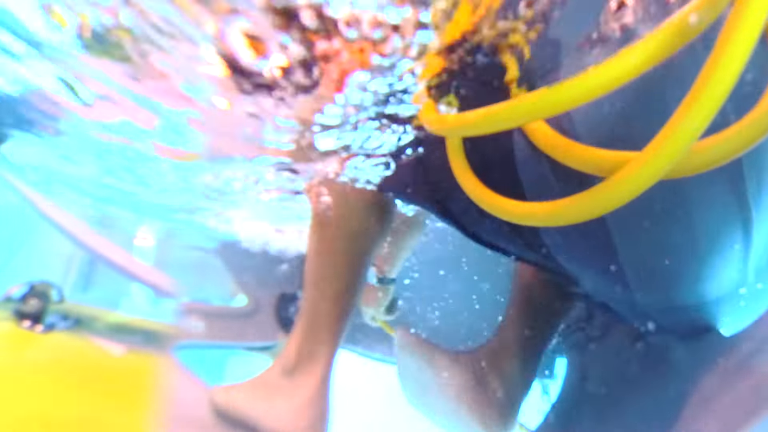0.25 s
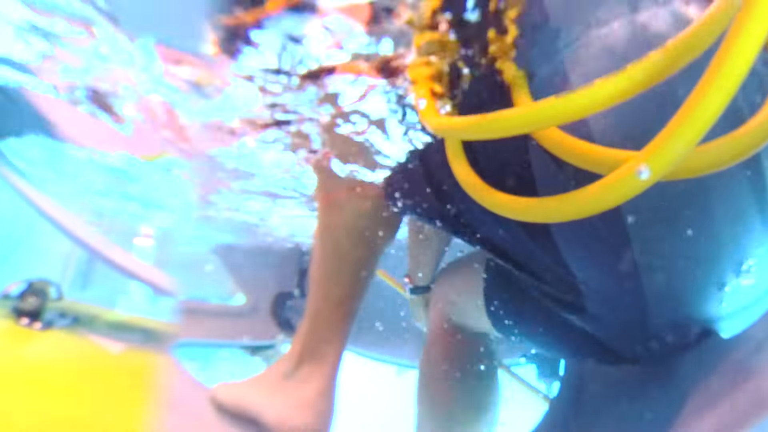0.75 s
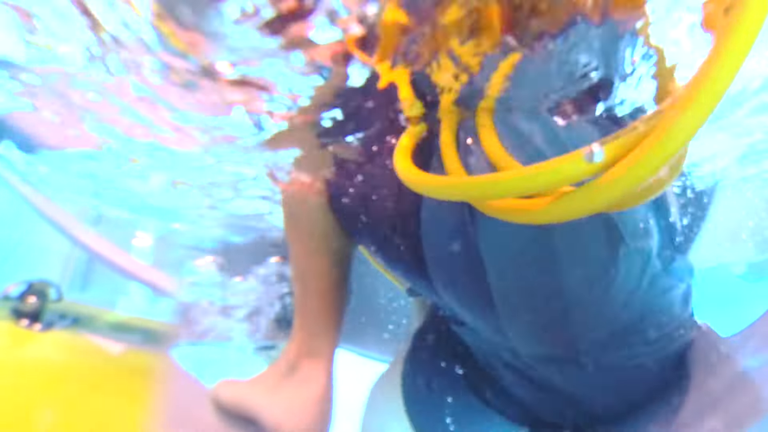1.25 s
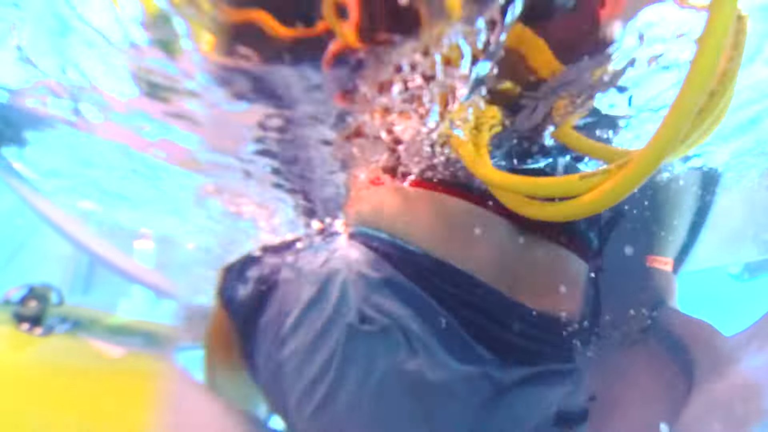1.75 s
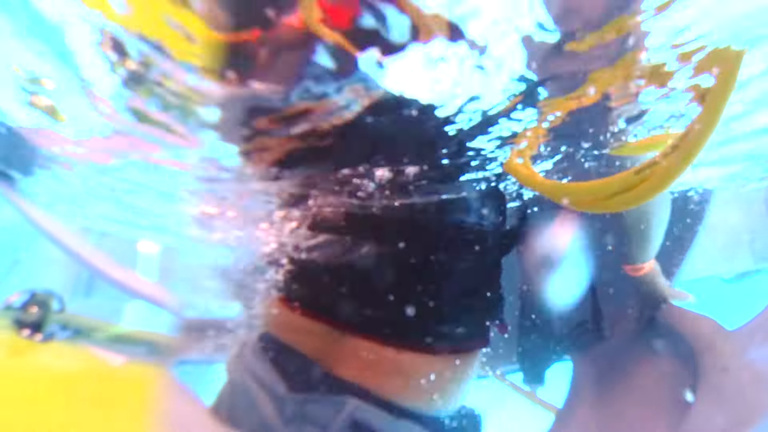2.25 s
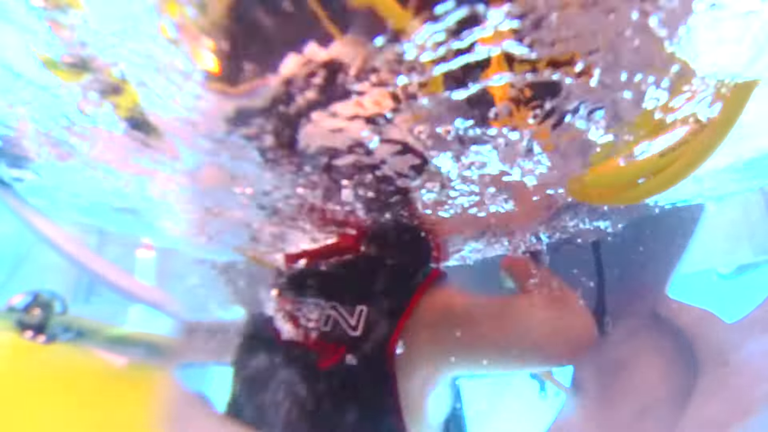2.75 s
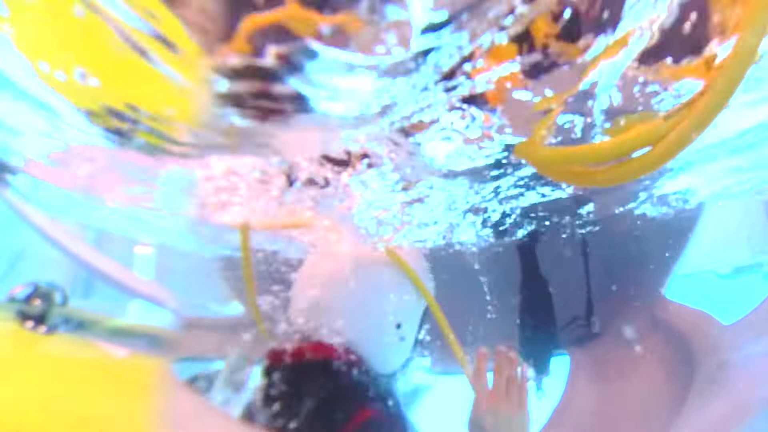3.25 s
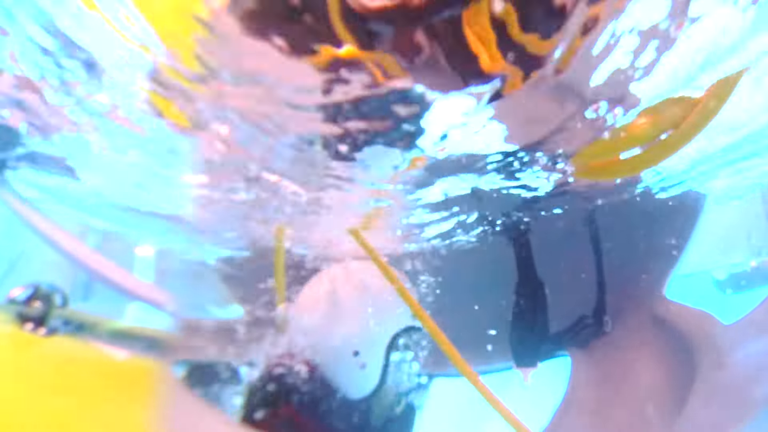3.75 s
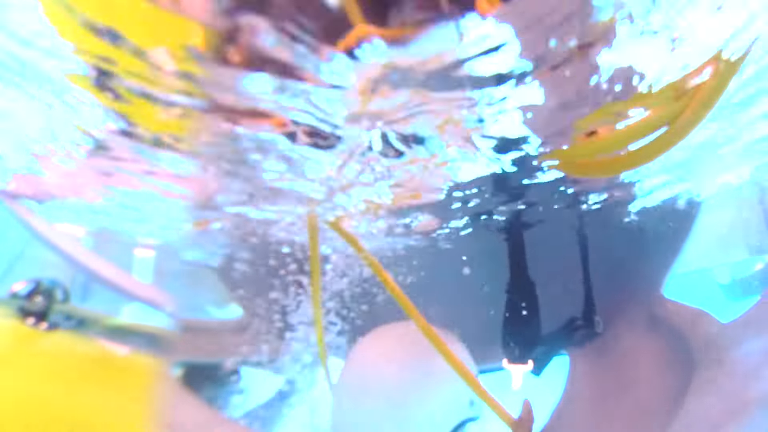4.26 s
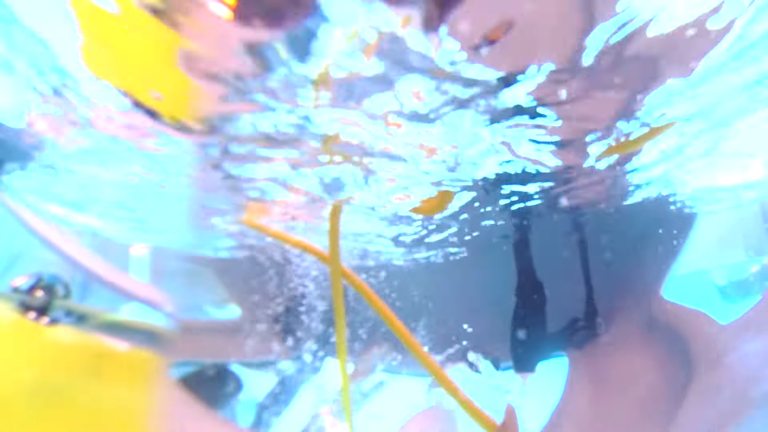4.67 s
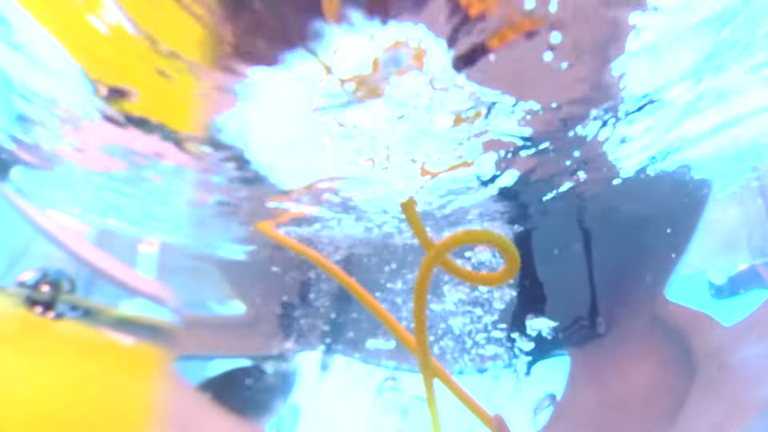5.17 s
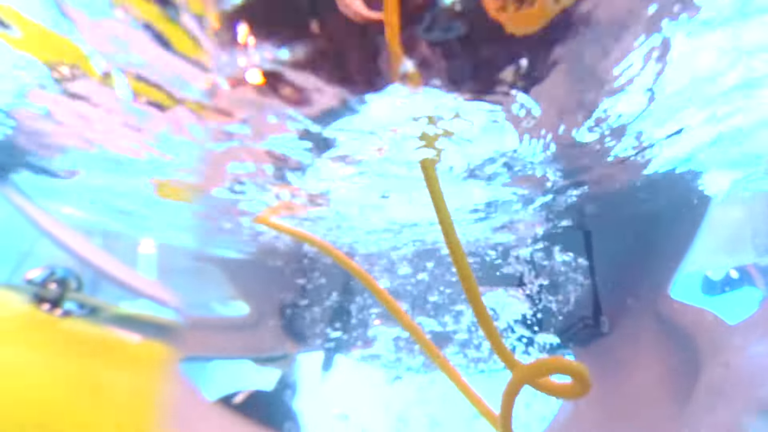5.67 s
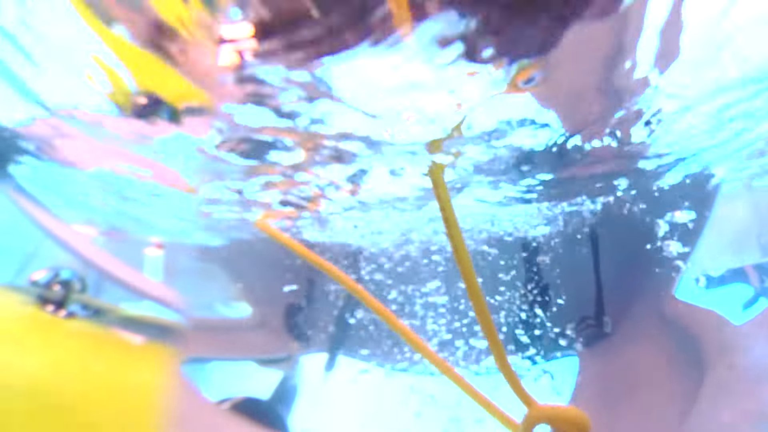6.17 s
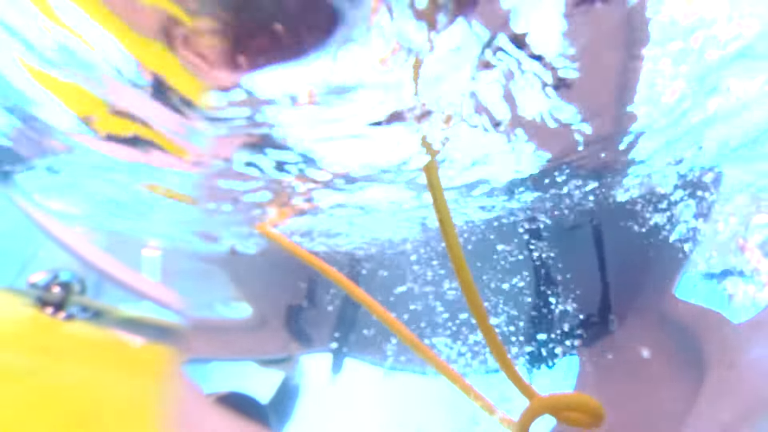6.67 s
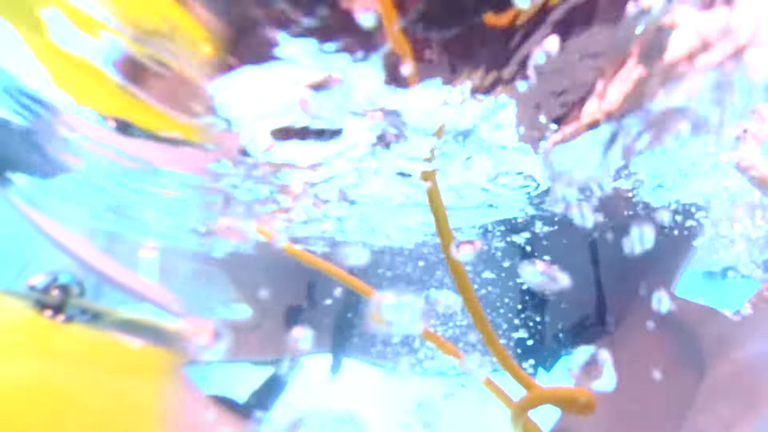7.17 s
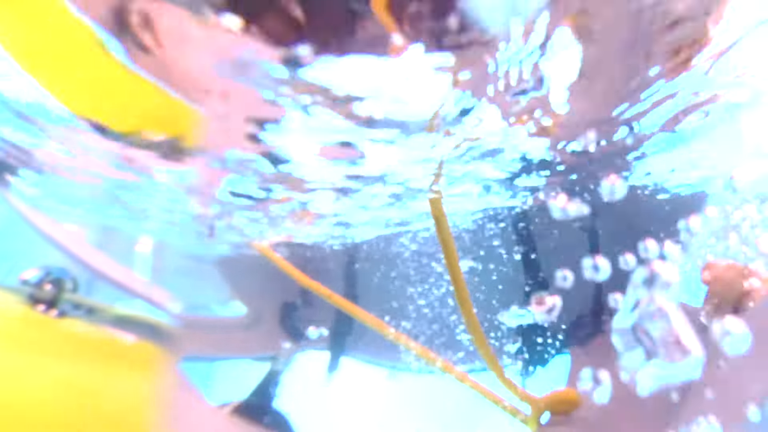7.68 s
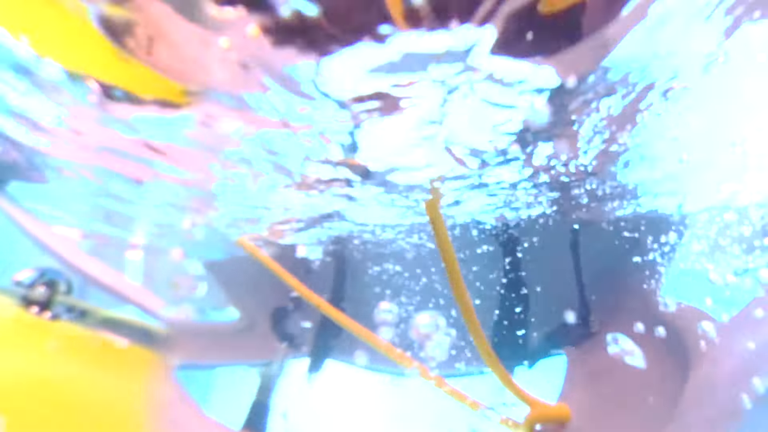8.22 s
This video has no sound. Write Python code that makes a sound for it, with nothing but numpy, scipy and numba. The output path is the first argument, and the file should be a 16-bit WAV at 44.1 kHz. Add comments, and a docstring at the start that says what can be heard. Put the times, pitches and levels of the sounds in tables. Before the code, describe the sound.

A camera sealed in a housing under water hears a helmet diver step down into a pool. From the start, muffled bubbles boom, gurgle and splash over low rumbling water pressure, with a brief surge and watery slaps around 0.25-0.5 s, then a thinner moment. The churn refills by 0.8 s; a heavy knock lands at 1.6 s. Foamy fizz thickens near 2.2 s. More knocks fall at 3.0, 3.7 and 3.9 s, with a bright splashy burst around 3.5 s and another surge near 4.6 s. Dense popping continues to 6.5 s, flecked with faint dry ticks. A dull knock at 6.9 s precedes thinning foam; from 7.1 s rounded blups glide past closely. Two sharp clicks at 7.75 s end the rush in a hush with faint sputtering hiss. A hollow knock at 7.9 s brings a few blups, near quiet at 8.1 s, then a warbling stream of similar bubbles until the end.

```python
"""Splashing, fizzing and booming bubbles, as a helmet diver climbs down into a pool.
They are heard by a camera under water in its sealed housing, which muffles them.
Most bubbles are fading sines that rise slightly in pitch; rounded blups swell, fade and glide up or down.
Filtered noise makes the rumble and hiss, short impulses tick, and damped sines knock.
Near the end a burst of air gurgles past the housing, clicks on it, hushes and knocks."""
import sys
import numpy as np
from scipy import signal
from scipy.io import wavfile
from scipy.ndimage import uniform_filter1d
from numba import njit

SR = 44100
rng = np.random.default_rng(int(sys.argv[2]) if len(sys.argv) > 2 else 0)


def store_wav(level_fs):
    """Save 16-bit WAV to argv[1]."""
    pcm = np.round(np.clip(np.atleast_2d(level_fs), -1, 1) * 32767)
    wavfile.write(sys.argv[1], SR, pcm.T.astype(np.int16))


N = 372643
TIME = np.arange(N) / SR  # seconds

# Levels in the tables are relative: later gains and filters shift them.
# water pushing on the housing, shape of its spectrum: f/Hz, level/dB per Hz
RUMBLE_SPECTRUM = [(10, -30), (18, -25.5), (28, -5), (50, -0.5), (90, -1.5), (140, -3.5), (300, -16.5),
                   (1000, -55.5), (3000, -92)]
# how hard the moving water leans on the housing: t/s, level/dB
PUSH_LEVEL = [(0, -30.5), (.25, -46), (.65, -33.5), (1.2, -40), (1.9, -31), (3.0, -34), (3.25, -39),
              (3.75, -46), (4.05, -31.5), (4.45, -35.5), (4.8, -44), (5.35, -38), (5.7, -48), (6.45, -53.5),
              (7.1, -31), (7.6, -53), (7.76, -34), (8.05, -56), (8.45, -35.5)]
# what the housing lets through: f/Hz, level/dB
HOUSING_SPECTRUM = [(20, 0.5), (1500, -1), (2000, -5), (3000, -14), (3900, -21), (4600, -39.5),
                    (8000, -58.5), (16000, -72.5)]
# faint hiss in the hush and over the stream: t/s, level/dB
HISS_LEVEL = [(7.72, -100), (7.745, -66), (7.81, -70), (7.86, -64), (7.888, -64), (7.92, -100), (8.2, -95),
              (8.29, -80), (8.36, -95)]
# lower and upper part of that hiss: f/Hz, level/dB
LOW_HISS_SPECTRUM = [(200, -3), (2500, -2), (3500, -4.5), (4700, 1), (6500, -7), (12000, -27)]
HIGH_HISS_SPECTRUM = [(200, -21), (5000, -13.5), (7200, -3), (10500, -2), (12500, -11), (17000, -22)]
# faint, dry ticks: t/s, peak level/dB
TICK_EVENTS = [(.167, -50), (.1765, -41), (.2663, -48), (.7866, -41), (.794, -51), (.8295, -46),
               (.8365, -46), (1.2864, -49.5), (1.3664, -54), (1.4664, -56), (2.437, -50.5), (2.5297, -47),
               (3.1063, -45), (3.6062, -53), (5.0669, -49.5), (5.1761, -51), (5.2565, -46), (5.3462, -58),
               (5.466, -54), (6.0865, -51), (6.1664, -44), (6.4562, -49), (6.5171, -43), (6.8668, -51),
               (7.097, -56), (7.4365, -55), (7.5462, -54.5), (7.576, -50), (8.141, -56), (8.277, -60),
               (8.336, -60)]
# colour of the ticks and the faint spray: f/Hz, level/dB
TICK_SPECTRUM = [(300, -23.5), (2000, -11), (4000, 8), (6000, -3), (9000, -10), (14000, -33.5),
                 (20000, -60)]
# sharp clicks as the air reaches the housing: t/s, peak level/dB
CLICK_EVENTS = [(7.7375, -16.5), (7.7575, -16.5), (7.7625, -41), (7.7778, -44), (7.7838, -40)]
# colour of the clicks: f/Hz, level/dB
CLICK_SPECTRUM = [(200, 18), (3000, -4), (7500, -6), (11500, -3), (14000, -17), (17000, -22)]
# stream of nearly equal bubbles singing around one pitch: t/s, level/dB
STREAM_LEVEL = [(0, -120), (8.10, -120), (8.15, -34), (8.18, -24), (8.33, -30.5), (8.41, -30), (8.44, -49)]
# slaps and knocks of water: t/s, peak level/dB, f/Hz, level of the spray/dB
KNOCK_EVENTS = [(0.2637, -19, 1100, -28.5), (.366, -14.5, 794, -26.5), (.519, -16.5, 1080, -27.5),
                (1.545, -13, 1170, -28.5), (1.636, -6.5, 540, -27), (1.661, -22, 1500, -32),
                (3.012, -8.5, 990, -32.5), (3.139, -17, 1360, -25.5), (3.71, -8.5, 960, -23.5),
                (3.92, -4.5, 1460, -31), (4.192, -13, 1010, -37), (4.211, -11.5, 1100, -32.5),
                (6.939, -3, 442, -42.5), (7.757, -13, 304, -53.5), (7.881, -24.5, 593, -61),
                (7.9030, -2.5, 686, -56)]
# sprays of small bubbles as an air pocket shatters: t/s, length/s, middle f/Hz, loudest peak level/dB
SPRAY_EVENTS = [(.19, .035, 3000, -40), (0.363, .012, 1150, -25.5), (0.511, 0.013, 2670, -32.5),
                (0.544, 0.073, 950, -23), (.57, 0.026, 2930, -37), (0.736, 0.047, 3640, -26.5),
                (.79, .035, 3700, -37), (0.879, 0.014, 1800, -21.5), (0.932, .015, 2680, -32.5),
                (1.85, 0.095, 1800, -21), (2.898, 0.045, 2420, -36), (3.517, 0.047, 2700, -25),
                (3.517, 0.054, 1680, -16), (3.98, .025, 566, -21.5), (4.058, 0.026, 2500, -35.5),
                (4.1, 0.044, 2220, -40), (5.836, .045, 1860, -17.5), (5.897, .012, 2790, -26),
                (6.616, 0.056, 3040, -31), (7.14, .02, 2390, -42), (7.201, 0.017, 2160, -34),
                (7.926, .015, 3000, -52), (8.26, 0.093, 3220, -44), (8.357, 0.087, 3200, -46)]
# rounded blups of bubbles sliding past: t/s, f/Hz, peak level/dB, length/s, rise/octaves (below 0: fall)
BLUP_EVENTS = [(.052, 493, -9.5, 0.018, 0.17), (0.184, 400, -20, 0.026, .1), (1.26, 330, -18.5, .04, .1),
               (1.412, 1240, -11, 0.0056, .1), (1.659, 1424, -14, 0.028, .05),
               (2.1182, 1400, -11, 0.0076, 0), (4.331, 1390, -15, 0.049, .03),
               (5.722, 1630, -9, .017, 0.18), (5.743, 107.3, -19.5, 0.08, .1),
               (5.905, 1300, -12, 0.013, 0.091), (6.658, 532, -14.5, 0.034, 0.072),
               (6.767, 171, -17, 0.039, .1), (6.797, 392, -16, 0.026, -0.11),
               (6.804, 112, -18.5, 0.064, 0.29), (6.835, 190, -12, 0.035, 0.48),
               (6.868, 190, -13, 0.077, 0.04), (7.011, 206, -14, 0.032, 0.32),
               (7.167, 960, -29, .035, 0.13), (7.243, 666, -21.5, 0.072, -.04),
               (7.322, 655, -23.5, 0.076, -0.089), (7.505, 340, -18, 0.03, -0.046),
               (7.625, 866, -20, 0.026, -.1), (7.19, 278, -16.5, 0.035, -0.14),
               (7.195, 622, -16.5, 0.07, 0.042), (7.381, 802, -14.5, 0.053, -0.021),
               (7.384, 289, -14, 0.055, 0.15), (7.461, 252, -17, 0.026, 0.048),
               (7.462, 376, -16, 0.021, -0.24), (7.476, 482, -18, 0.037, 0.14),
               (7.512, 494, -15.5, 0.05, 0.22), (7.559, 863, -18, 0.03, 0.15),
               (7.574, 407, -12, 0.042, 0.28), (7.624, 444, -11, 0.045, -0.014),
               (7.627, 559, -14.5, 0.046, 0.014), (7.68, 580, -15.5, 0.045, 0.028),
               (7.696, 374, -10, 0.021, -0.15), (7.711, 293, -16, 0.027, 0.23),
               (7.723, 466, -9, 0.027, -0.19), (7.733, 141, -17, 0.018, -1.2), (7.745, 48, -21, 0.027, -.3),
               (7.943, 485, -20, 0.031, -0.18), (7.944, 694.5, -22, 0.08, -0.0078),
               (8.006, 1060, -23.5, 0.014, .15), (8.01, 522, -25, 0.032, 0.27),
               (8.175, 975, -13.5, 0.064, 0.091), (8.237, 1045, -19, 0.025, -0.0088),
               (8.262, 964, -17, 0.023, -0.11), (8.29, 1036, -17, 0.025, -0.17),
               (8.304, 965, -15, 0.018, 0.28), (8.321, 1010, -20, 0.022, 0.27),
               (8.348, 145, -20, 0.035, 0.2), (8.371, 1020, -12.5, 0.028, 0.41),
               (8.398, 1035, -14, 0.035, 0.19)]
# strength of a cloud's bubbles by pitch: f/Hz, level/dB
STRENGTH_BY_PITCH = [(85, -15.5), (120, -6), (160, 1.5), (195, 5), (250, -0.5), (300, -1.5), (450, -2.5),
                     (620, 3.5), (780, 0), (1050, 4), (1190, 2), (1380, 8.5), (1600, -5), (2000, -6)]
# as foam gives way to separate bubbles, they are fewer and ring longer: t/s, factor
SEPARATENESS = [(0, 1.7), (.7, 1.1), (2.2, .9), (3.3, 1.2), (4.6, 1.0), (6.4, 1.1), (7.1, 1.9), (7.7, 1.4),
                (8.0, 2.4), (8.45, 2.2)]
# swells and dips of the churn: t/s, length/s, change/dB, depth of the lull afterwards/dB (below 0: none)
SWELLS_AND_DIPS = [(0.057, 0.16, 3, 1), (0.252, 0.036, 11.5, 5), (0.694, 0.19, 2, 4.5),
                   (1.632, 0.05, 7.5, 4), (2.465, 0.13, 1, 3.5), (2.724, 0.11, 0, 1.5),
                   (3.132, 0.023, 8.5, 11.5), (3.679, 0.014, -11.5, 3.5), (3.917, 0.19, -2, 3),
                   (5.87, 0.031, -1, 2), (6.948, 0.12, -0.5, 2), (7.637, 0.12, 1, 19.5),
                   (7.928, 0.15, 6, -3.5)]
# big, booming air pockets: t/s, level/dB
BOOM_LEVEL = [(0, -39.5), (.12, -27), (.32, -29.5), (.52, -42.5), (.78, -26), (1.3, -24), (1.75, -27.5),
              (2.4, -24.5), (3.1, -26), (3.3, -28.5), (3.48, -26.5), (3.7, -37.5), (3.95, -25.5),
              (4.35, -42), (4.7, -24), (5.2, -26.5), (5.8, -25.5), (6.1, -27.5), (6.4, -32), (6.85, -26),
              (7.6, -30), (8.0, -26), (8.12, -40.5), (8.2, -33.5), (8.45, -26.5)]
# gurgling, middle-sized bubbles: t/s, level/dB
GURGLE_LEVEL = [(0, -26.5), (.5, -43), (.8, -27.5), (1.25, -28.5), (1.6, -32), (1.78, -34.5), (1.92, -28),
                (2.4, -33), (2.85, -26), (3.3, -34.5), (3.6, -30.5), (4.15, -35.5), (4.4, -33),
                (4.85, -27.5), (5.85, -26.5), (6.2, -30.5), (6.5, -24.5), (6.98, -24.5), (7.14, -22.5),
                (7.22, -23), (7.72, -22), (8.05, -31.5), (8.11, -38), (8.18, -31.5), (8.33, -26.5),
                (8.45, -38)]
# small, splashing bubbles: t/s, level/dB
SPLASH_LEVEL = [(0, -22), (.35, -37.5), (.6, -26), (.9, -27), (1.22, -20.5), (1.75, -27.5), (1.95, -24),
                (2.12, -26), (2.35, -21.5), (2.85, -28), (3.1, -25), (3.27, -28), (3.4, -23.5),
                (3.57, -17.5), (4.05, -26.5), (4.25, -24.5), (4.65, -18.5), (5.05, -23), (5.35, -23),
                (5.7, -23), (6.1, -22), (6.5, -23), (6.9, -35), (7.42, -29), (7.75, -31.5), (8.11, -37),
                (8.2, -28.5), (8.3, -25), (8.45, -31)]
# foam, the fizz relative to the splash: t/s, level/dB
FOAM_LEVEL = [(0, -12), (.32, -17.5), (.62, -15), (.78, -10), (1.15, -16), (2.15, -5.5), (2.62, -14.5),
              (2.73, -8.5), (2.88, -15), (3.05, -8), (3.25, -13.5), (3.5, -12.5), (4.0, -17), (4.5, -13),
              (5.4, -15.5), (5.9, -12), (6.3, -14.5), (6.95, -11.5), (7.4, -28.5), (7.6, -32), (8.23, -34),
              (8.45, -28)]
# pitch of the smallest bubbles in the gurgle: t/s, f/Hz
SMALLEST_IN_GURGLE = [(6.48, 905), (6.62, 569), (7.05, 633), (7.2, 708), (7.45, 597), (7.7, 592),
                      (7.95, 740)]
# pitch of the smallest bubbles in the splash: t/s, f/Hz
SMALLEST_IN_SPLASH = [(0, 1387), (1.2, 1634), (7.0, 1670), (7.22, 887), (7.7, 896), (7.95, 1080),
                      (8.05, 1128), (8.2, 1052)]
# single loud bubbles close to the housing: t/s, f/Hz, peak level/dB, ring time/s
LOUD_BUBBLES = [(0.104, 456, -11, 0.0062), (.129, 835, -18, 0.0088), (.156, 1100, -9, 0.0088),
                (0.19, 202.4, -5.5, 0.013), (.262, 2060, -22, 0.003), (.267, 185.5, -8, 0.02),
                (.274, 333, -15.5, 0.0097), (.424, 3030, -33, 0.0033), (0.517, 3010, -34, 0.0046),
                (.676, 1366, -15.5, 0.0079), (0.729, 179, -8, 0.0073), (0.758, 1400, -11.5, 0.0043),
                (0.777, 1550, -15, 0.0018), (.802, 674, -11.5, 0.0088), (0.838, 2180, -20, .002),
                (0.851, 169.6, -7, 0.011), (.866, 3600, -22.5, 0.0034), (1.065, 1078, -16.5, 0.013),
                (1.155, 1360, -11, 0.0036), (1.179, 1410, -10.5, 0.02), (1.178, 1850, -10, 0.0052),
                (1.248, 1459, -11, 0.011), (1.265, 155, -11, 0.0091), (1.274, 269, -14, 0.0085),
                (1.305, 1050, -11, 0.0053), (1.319, 1340, -12.5, .008), (1.458, 2095, -13, 0.0049),
                (1.654, 284, -12, 0.018), (1.726, 1033, -13, 0.0098), (1.959, 211, -17, 0.014),
                (1.976, 930, -9, 0.0038), (2.073, 169.5, -12.5, 0.011), (2.135, 191.6, -10, 0.049),
                (2.251, 796, -17, 0.014), (2.373, 221, -12, 0.02), (2.538, 1078, -9.5, 0.0049),
                (2.555, 210.8, -11, 0.051), (2.678, 2860, -26, 0.0033), (2.721, 420, -12.5, 0.015),
                (2.74, 215, -16, 0.021), (2.752, 1290, -12, .0025), (2.771, 171, -11.5, 0.014),
                (2.803, 620, -15.5, 0.009), (2.837, 174, -12, 0.025), (2.887, 172, -15.5, .014),
                (2.966, 1010, -9, 0.0038), (3.12, 200, -7.5, 0.01), (3.132, 488, -18.5, 0.013),
                (3.154, 183, -9.5, 0.054), (3.297, 1317, -15.5, 0.0053), (3.305, 1920, -20.5, 0.0055),
                (3.405, 1120, -18, .006), (3.472, 1420, -9, 0.0022), (3.544, 1360, -11.5, .005),
                (3.558, 900, -16, 0.0059), (3.623, 1380, -6, 0.0023), (3.627, 775, -14.5, 0.0076),
                (3.642, 1320, -4, 0.0016), (3.645, 1100, -17.5, 0.0038), (3.84, 1421, -16, 0.0054),
                (3.85, 183.6, -9, 0.052), (3.952, 1720, -6.5, 0.0028), (3.984, 237, -9.5, 0.013),
                (4.013, 193, -6, 0.036), (4.194, 977, -9.5, 0.0063), (4.301, 1120, -15, .0035),
                (4.503, 876, -10, 0.012), (4.523, 1405, -5.5, 0.0045), (4.542, 985, -7, 0.0043),
                (4.56, 685, -14.5, 0.01), (4.563, 129, -16, 0.011), (4.595, 1310, -5, 0.0053),
                (4.608, 1464, -11, .005), (4.629, 1100, -13, 0.0041), (4.701, 1340, -8, 0.0077),
                (4.746, 377, -10, 0.0042), (4.782, 1340, -8, 0.0026), (4.912, 596, -13, 0.0075),
                (4.976, 273, -7.5, 0.0064), (4.989, 216.5, -11, 0.038), (5.075, 191, -11, 0.0053),
                (5.163, 1492, -10, 0.0062), (5.214, 911, -10.5, 0.015), (5.245, 1314, -6.5, 0.0038),
                (5.298, 210, -13.5, 0.012), (5.324, 132, -17, 0.014), (5.437, 1360, -9.5, 0.011),
                (5.444, 170.5, -16.5, .015), (5.474, 1342, -11, 0.0077), (5.477, 976, -9, 0.0015),
                (5.568, 215, -12.5, 0.024), (5.664, 1317, -10, 0.0058), (5.883, 457, -7.5, 0.0079),
                (5.908, 735, -9, 0.0076), (5.921, 191.6, -9, 0.052), (6.041, 1390, -6, 0.0022),
                (6.086, 797, -12, 0.0057), (6.087, 1450, -8.5, .005), (6.106, 966, -7, 0.0021),
                (6.117, 261, -16, 0.01), (6.215, 189.8, -13, 0.083), (6.301, 1240, -9, 0.0076),
                (6.324, 1007, -14, 0.016), (6.44, 728, -13.5, 0.015), (6.48, 675, -5.5, 0.0021),
                (6.557, 168, -8.5, 0.02), (6.628, 261.4, -13, 0.039), (6.655, 390, -9, 0.02),
                (6.666, 1370, -15.5, 0.0092), (6.726, 392, -6, 0.0065), (6.827, 2510, -24.5, 0.0032),
                (6.945, 600, -10, 0.0091), (6.993, 413, -6, 0.0045), (6.994, 1466, -17, 0.011),
                (6.999, 2730, -35, 0.0045), (7.079, 1583, -23.5, 0.0098), (7.096, 262, -8.5, 0.0046),
                (7.145, 2230, -39.5, 0.0048), (7.178, 1322, -25, 0.018), (7.198, 2250, -36, 0.0071),
                (7.421, 1456, -25, 0.011), (7.437, 2610, -40.5, 0.0038), (7.697, 1514, -38, 0.0023),
                (7.937, 3160, -36, .003), (8.139, 3730, -28, 0.0021), (8.158, 168, -8, 0.0049),
                (8.256, 716, -15, 0.0015), (8.257, 1550, -29.5, 0.0066), (8.286, 1790, -32.5, 0.0059),
                (8.286, 3140, -43, 0.0036), (8.399, 3180, -34, 0.0063), (8.425, 326, -12, 0.0018),
                (8.426, 1420, -22.5, .003)]

STRAY_SHARE = 0.14  # strength of the stray bubbles that are smaller still
CHANGE_EDGE_S, LULL_HOLD_S, RECOVER_DB_PER_S = 0.018, 0.07, 52.5
KNOCK_SPRAY_S = 0.031  # decay time of a knock's spray
BLUP_SKEW = 0.74  # under 1: a blup swells faster than it fades
# range of pitch, ring time and range of strength of the bubbles in a spray
SPRAY_OCTAVES, SPRAY_CYCLES, SPRAY_SPREAD_DB = .7, 5.1, 22
EDGE_HZ = 15800  # upper edge of the sound


def gain_of(db):
    """Turns decibels into a gain."""
    return 10 ** (np.asarray(db) / 20)


def evened(x):
    """Scales a sound to rms 1."""
    return x / np.sqrt(np.mean(x ** 2) + 1e-20)


def read(points, hz):
    """Reads a spectrum's dB at the given frequencies."""
    f, db = np.transpose(points)
    return np.interp(np.log(hz + 1), np.log(f), db)


def curve(rows, axis=1):
    """Turns one column of a table into a value for every sample."""
    rows = np.array(rows)
    return np.interp(TIME, rows[:, 0], rows[:, axis])


def add(mix, s, sound):
    """Mixes a sound in at time s, in seconds."""
    part = mix[max(round(s * SR), 0):][:len(sound)]
    part += sound[:len(part)]


def response(points, size=8192):
    """Makes the impulse response with a given spectrum, with no sound before its start."""
    hz = abs(np.fft.fftfreq(size, 1 / SR))
    log_gain = np.log(gain_of(read(points, hz)))
    spectrum = np.exp(np.conj(signal.hilbert(log_gain)))  # minimum phase
    return np.fft.ifft(spectrum).real[:size // 2]


def coloured(x, points):
    """Filters a sound by a spectrum."""
    return signal.oaconvolve(x, response(points))[:N]


def steadied(x, span):
    """Holds the rms near 1 over span seconds, leaving faster bursts alone."""
    size = int(span * SR) + 1
    power = uniform_filter1d(uniform_filter1d(x ** 2, size), size)
    floor = 0.0084 * np.mean(x ** 2)  # keeps near-silence from being blown up
    return x / np.sqrt(abs(power) + floor)


def clumps(depth_db, rate_hz):
    """Makes a gain that wanders at random, as bubbles come in clumps."""
    steps = rng.standard_normal(1000)
    return gain_of(depth_db * np.interp(TIME * rate_hz, np.arange(len(steps)), steps))


@njit
def ring_out(size, at, hz, ring, peak, glide, swell, rate):
    """Sums decaying sines that swell up and glide in pitch."""
    out = np.zeros(size)
    for k in range(len(at)):
        life = ring[k] * rate  # ring time in samples
        # each sample turns the sine and shrinks it; bend then changes the turning speed
        turn = np.exp(2j * np.pi * hz[k] / rate - 1 / life)
        bend = np.exp(2j * np.pi * hz[k] / rate * glide[k] / life)
        release = np.exp(-hz[k] / (swell[k] * rate))
        z = peak[k] + 0j
        held = 1.  # the part of the start still held back
        for n in range(at[k], min(at[k] + int(8 * life), len(out))):
            out[n] += z.imag * (1 - held) ** 2
            z, turn, held = z * turn, turn * bend, held * release
    return out


def bubble(s, hz, ring, peak, glide, gentle=1):
    """Air pockets ring at their own pitch; glide is the rise per ring time, gentle slows the start."""
    swell_cycles = gentle * (0.23 + 75 / hz)  # big bubbles take longer to get going
    q = swell_cycles / (hz * ring)
    crest = (q / (2 + q)) ** q * (2 / (2 + q)) ** 2  # height of the envelope
    at = np.maximum(s * SR, 0).astype(np.int64)
    return ring_out(N, at, hz * (1 - glide), ring, peak / crest, glide, swell_cycles, float(SR))


def cloud(low_hz, high_hz, per_s, cycles, spread_db, span, tilt_db=0, smallest=None, glide=0.028):
    """Bubbles of many sizes born at random moments; most just pop, some sing, a few are loud."""
    place, keep, step, size, sign, damping, rise = rng.random((7, 40000))
    s = place * N / SR
    hz = low_hz * (high_hz / low_hz) ** step
    separate = np.interp(s, *np.transpose(SEPARATENESS))
    ring_cycles = cycles * separate * np.exp(-.55 * np.log(damping))
    ring = np.clip(ring_cycles, .7, 22) / hz
    db = read(STRENGTH_BY_PITCH, hz) + tilt_db * step
    db = db + spread_db * np.minimum(-np.log(size), 3.1)  # a few are much louder
    peak = np.sign(sign - .5) * gain_of(db) * (hz * ring) ** -.25 * np.sqrt(hz)
    if smallest is not None:
        limit_hz = np.interp(s, *np.transpose(smallest))
        peak = peak * (STRAY_SHARE + 1.0 / (1 + (hz / limit_hz) ** 30))
    born = keep < per_s / separate * N / SR / len(s)
    out = bubble(s[born], hz[born], ring[born], peak[born], glide * rise[born],
                 gentle=separate[born] ** 0.88)
    soft = signal.butter(6, min(1.1 * high_hz, 9000), fs=SR, output="sos")
    return steadied(signal.sosfilt(soft, out), span)


def rumble():
    """Moving water leans on the housing: low, filtered noise."""
    noise = evened(coloured(rng.standard_normal(N), RUMBLE_SPECTRUM))
    return gain_of(curve(PUSH_LEVEL) + 1.5) * noise


def hiss():
    """Faint spray of noise follows the foam; sputtering noise swells in the hush and over the stream."""
    spray = evened(coloured(rng.standard_normal(N), TICK_SPECTRUM))
    spray = spray * gain_of(curve(SPLASH_LEVEL) + curve(FOAM_LEVEL) - 49.5)
    sputter = np.zeros(N)
    for spectrum in (LOW_HISS_SPECTRUM, HIGH_HISS_SPECTRUM):
        noise = coloured(rng.standard_normal(N), spectrum)
        sputter += evened(noise * clumps(depth_db=5, rate_hz=98))
    return spray * clumps(depth_db=4.5, rate_hz=24) + gain_of(curve(HISS_LEVEL) - 1) * sputter


def prickle():
    """Many faint ticks fall at random, stronger in thick foam."""
    chance, size = rng.random((2, N))
    shape = response(TICK_SPECTRUM)
    speck_db = -53 + 14 * size ** 3 + .42 * (curve(SPLASH_LEVEL) + curve(FOAM_LEVEL))
    touches = (chance < 36 / SR) * gain_of(speck_db)  # about 36 a second
    return signal.oaconvolve(touches, shape / abs(shape).max())[:N]


def ticks(rows, colour):
    """Single bright impulses, shaped by a spectrum."""
    out, shape = np.zeros(N), response(colour)
    for s, db in rows:
        add(out, s, gain_of(db) * shape / abs(shape).max())
    return out


def pool(x):
    """The walls and the surface send back a faint, short wash of echoes."""
    t = np.arange(SR // 3) / SR
    t60 = 0.94  # seconds to fall 60 dB at this rate; the wash is cut off sooner
    tail = rng.standard_normal(len(t)) * gain_of(-60 * t / t60) * (t > .004)
    return x + gain_of(-13.5) * signal.oaconvolve(x, tail / np.linalg.norm(tail))[:N]


def stream():
    """Air pinches off in bubbles of nearly one size, which warble together."""
    bubbles = cloud(930, 1050, per_s=130, cycles=8, spread_db=1.0, span=.05, glide=.03)
    return gain_of(curve(STREAM_LEVEL)) * bubbles


def knocks():
    """Abrupt, heavily damped blows with a low thud under each."""
    out, t = np.zeros(N), np.arange(SR // 20) / SR
    for s, db, hz, _ in KNOCK_EVENTS:
        blow = np.sin(2 * np.pi * hz * t) * np.exp(-t * hz / 1.0)
        thud = 0.17 * np.sin(2 * np.pi * 210 * t) * np.exp(-t / 0.0086)
        knock = (blow + thud) * (1 - np.exp(-t * hz / 0.29))
        add(out, s, gain_of(db) * knock / abs(knock).max())
    return out


def knock_spray():
    """Each knock shakes loose a brief spray of small bubbles."""
    power, t = np.zeros(N), np.arange(SR // 8) / SR
    for s, _, _, spray_db in KNOCK_EVENTS:
        add(power, s, gain_of(spray_db) ** 2 * np.exp(-2 * t / KNOCK_SPRAY_S))
    bubbles = cloud(350, 3400, per_s=2000, cycles=3.7, spread_db=4.5, span=0.047, tilt_db=-12)
    return np.sqrt(power) * bubbles


def sprays():
    """Each shattering pocket is a handful of bubbles of like size, thickest at its start."""
    start, length, hz, db = np.array(SPRAY_EVENTS, float).T[:, :, None]
    draws = rng.random((len(SPRAY_EVENTS), 4, 24))  # 24 bubbles in each spray
    when, step, size, sign = np.moveaxis(draws, 1, 0)
    s = (start + length * when ** 1.2).ravel()
    pitch = (hz * 2 ** (SPRAY_OCTAVES * (step - .5))).ravel()
    peak = (np.sign(sign - .5) * gain_of(db - SPRAY_SPREAD_DB * size)).ravel()
    return bubble(s, pitch, SPRAY_CYCLES / pitch, peak, np.full(len(s), .02))


def blups():
    """Each passing bubble swells and fades on one clean note, most of them gliding up or down."""
    out = np.zeros(N)
    for s, hz, db, length, rise in BLUP_EVENTS:
        age = np.arange(0, length, 1 / SR) / length  # 0 to 1
        turns = np.cumsum(hz * 2 ** (rise * (age - .5))) / SR
        swell = np.sin(np.pi * age ** BLUP_SKEW) ** 2
        add(out, s, gain_of(db) * swell * np.sin(2 * np.pi * turns))
    return out


def chirps(per_s, low_hz, high_hz, ring_s, above_db, tilt_db, spread_db):
    """Now and then a tiny bubble chirps, at a level that follows the fizz."""
    place, keep, step, size = rng.random((4, 400))
    s = place * N / SR
    born = keep < per_s * N / SR / len(place)
    fizz_db = np.interp(s, TIME, curve(SPLASH_LEVEL) + curve(FOAM_LEVEL))
    peak = gain_of(fizz_db + above_db + tilt_db * step + spread_db * size ** 2)
    hz = low_hz * (high_hz / low_hz) ** step
    same = np.ones(born.sum())
    return bubble(s[born], hz[born], ring_s * same, peak[born], .015 * same)


def swelling_and_dipping():
    """A gain that swells or dips for a moment; most times a lull follows and steadily recovers."""
    db = np.zeros(N)
    for s, length, change_db, lull_db in SWELLS_AND_DIPS:
        since = TIME - s - length  # seconds since the change ended
        recovered_db = RECOVER_DB_PER_S * np.maximum(since - LULL_HOLD_S, 0)
        lull = np.maximum(lull_db - recovered_db, 0)
        db += np.where(since < 0, change_db * (TIME >= s), -lull)
    return gain_of(uniform_filter1d(db, int(CHANGE_EDGE_S * SR) + 1))


def churning():
    """Four clouds, from fist-sized pockets of air down to foam; the smaller sizes clump together."""
    boom = cloud(80, 285, per_s=100, cycles=2.5, spread_db=1.0, span=0.1)
    boom = boom * clumps(depth_db=1.5, rate_hz=14)
    gurgle = cloud(280, 760, per_s=190, cycles=3.5, spread_db=0.5, span=0.014,
                   smallest=SMALLEST_IN_GURGLE, glide=.05)
    splash = cloud(750, 1651.3, per_s=450, cycles=4.8, spread_db=2.0, span=0.069,
                   smallest=SMALLEST_IN_SPLASH, glide=0.046)
    fizz = cloud(1623, 4200, per_s=1900, cycles=6, spread_db=4.5, span=0.19, tilt_db=-22.5)
    small = (splash + fizz * gain_of(curve(FOAM_LEVEL))) * gain_of(curve(SPLASH_LEVEL) - 2.17)
    middle = gurgle * gain_of(curve(GURGLE_LEVEL) + 0.3)
    together = clumps(depth_db=2.5, rate_hz=32)
    return boom * gain_of(curve(BOOM_LEVEL) + 2.5) + together * (middle + small)


def loud_bubbles():
    """Single bubbles ring close to the housing."""
    s, hz, db, ring = np.array(LOUD_BUBBLES, float).T
    return bubble(s, hz, np.maximum(ring, .0003), gain_of(db - 1.5), np.full(len(s), .008))


def scene():
    """Water sounds come muffled through the housing; ticks, clicks and hiss stay bright."""
    tiny = chirps(per_s=10, low_hz=1590, high_hz=3660, ring_s=0.0026,
                  above_db=7.0, tilt_db=-8.0, spread_db=15.5)
    churn = swelling_and_dipping() * (churning() + tiny + rumble())
    echoing = pool(loud_bubbles() + knocks() + knock_spray())
    water = coloured(churn + stream() + blups() + sprays() + echoing, HOUSING_SPECTRUM)
    bright = ticks(TICK_EVENTS, TICK_SPECTRUM) + prickle() + ticks(CLICK_EVENTS, CLICK_SPECTRUM) + hiss()
    return (water + bright)[None]


def record(dry):
    """A steep low-pass filter removes the treble above the upper edge."""
    low_pass = signal.firwin(511, EDGE_HZ, window=("kaiser", 9), fs=SR)
    return signal.oaconvolve(dry, low_pass[None], "same")


dry = scene()
out = record(dry)
store_wav(out)
```